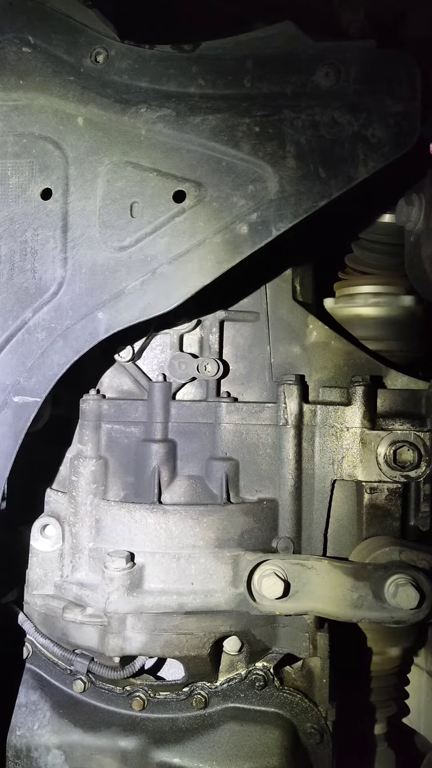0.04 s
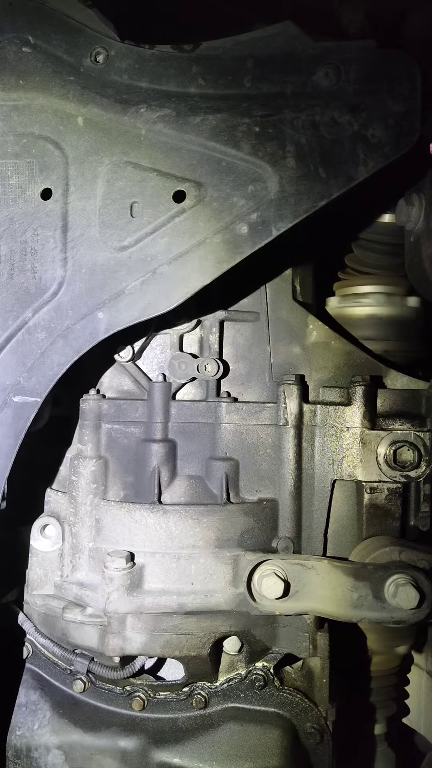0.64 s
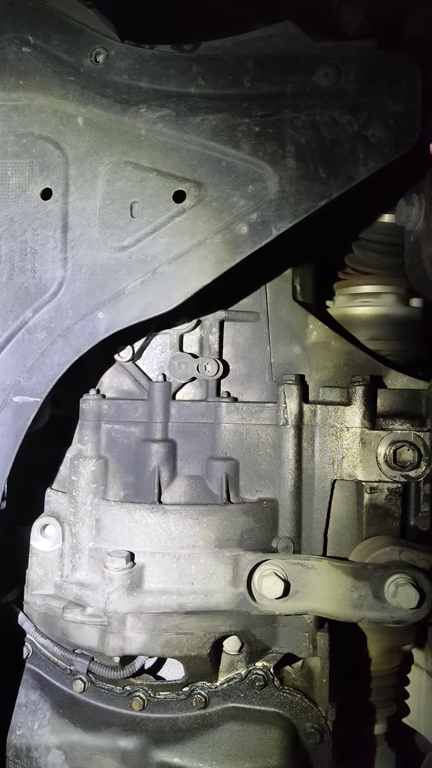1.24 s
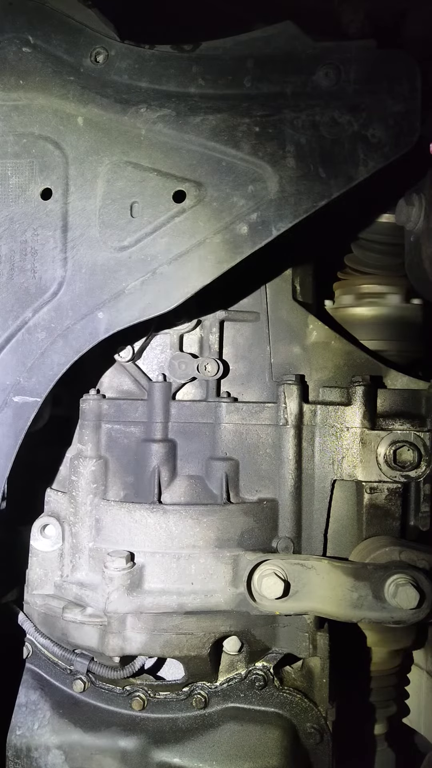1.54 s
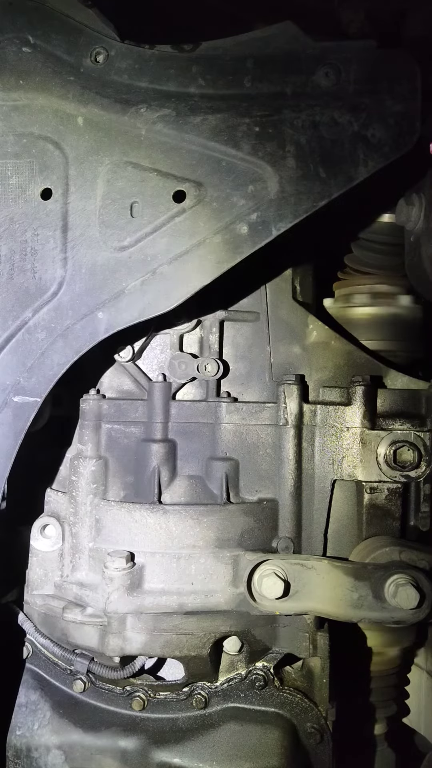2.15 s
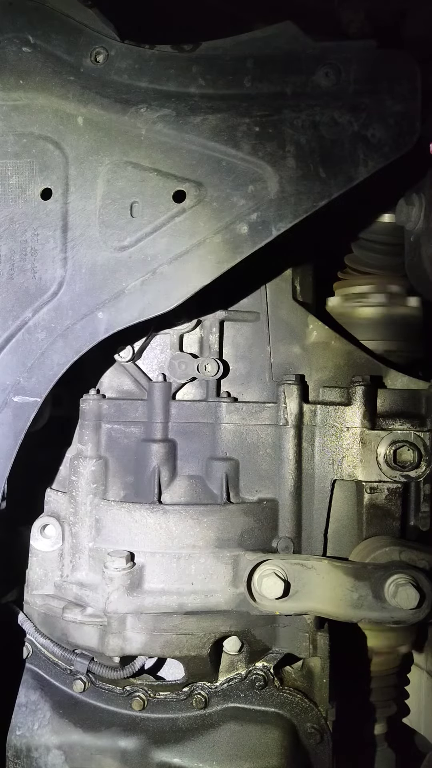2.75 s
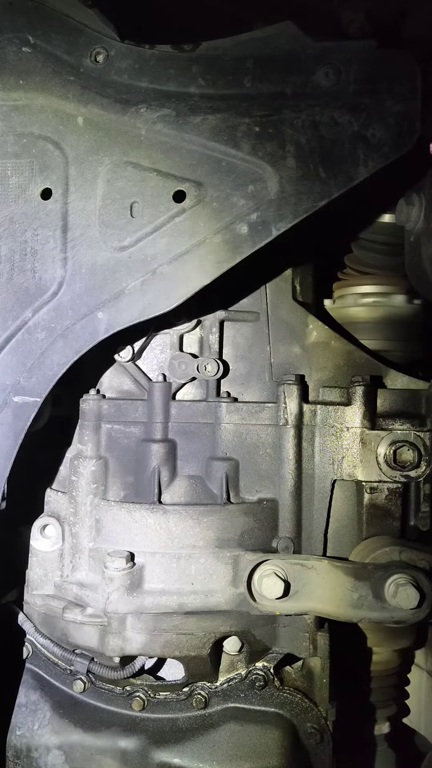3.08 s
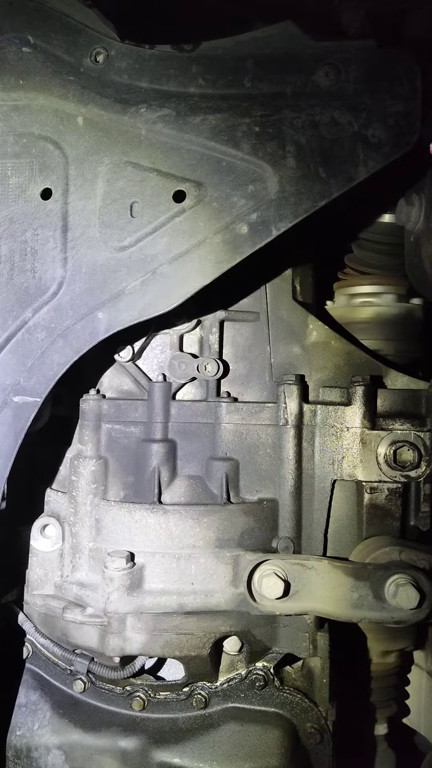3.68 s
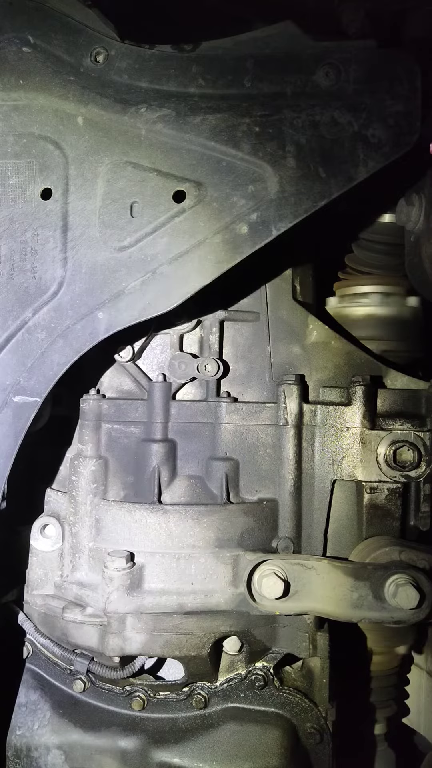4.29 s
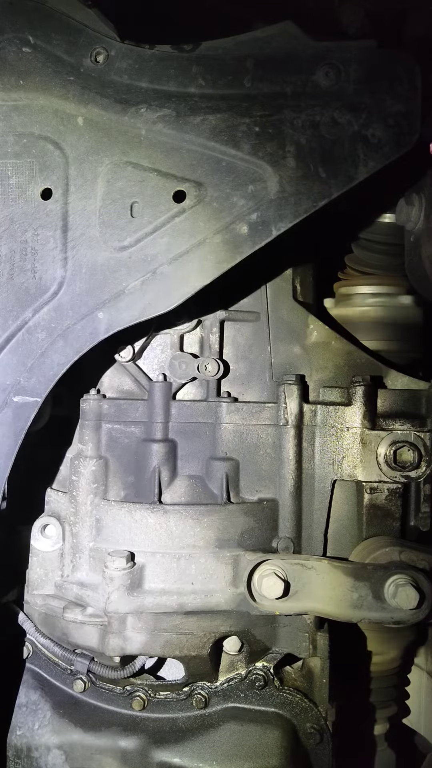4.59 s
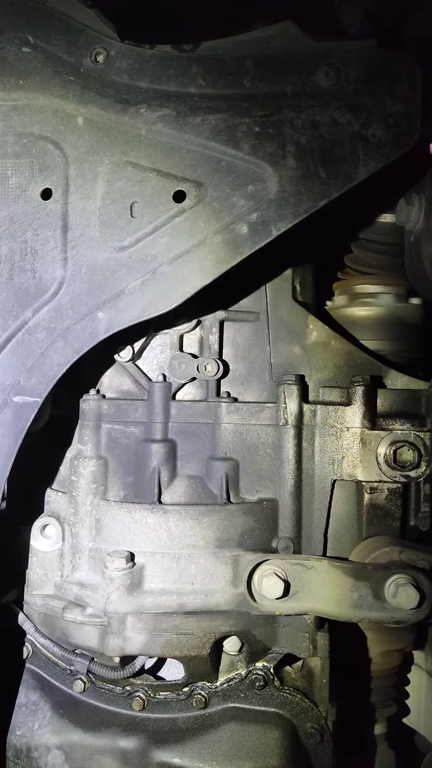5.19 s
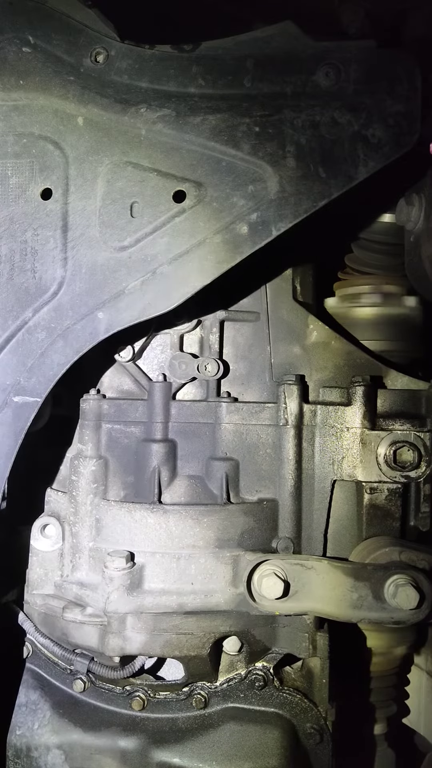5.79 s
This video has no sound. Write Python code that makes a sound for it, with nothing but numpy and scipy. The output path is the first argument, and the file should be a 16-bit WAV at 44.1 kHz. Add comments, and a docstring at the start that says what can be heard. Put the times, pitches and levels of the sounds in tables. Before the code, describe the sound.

A car drivetrain runs at an even speed, heard from close beneath its metal gear casing, whining over a rough, slightly hollow hiss and grind. The throttle closes and the pitch falls, with sharp metal knocks and a short, fluttering alternator whistle. Uneven clatter and small knocks from the slack gears continue at the lower speed until the whine picks up a little.

```python
"""A steady gear whine under a running car sinks as the throttle closes, then picks up again.
Meshing gear teeth, the firing engine and a belt-driven alternator all follow one speed. Bearings and
teeth grind in the ribbed metal casing under a broad hiss. The teeth have a little play (backlash), so
they rattle and knock in short bursts, mostly once the load has come off and while it returns.
Most parts get louder or softer with the speed and with the load, how hard the teeth are pressed."""
import sys
import numpy as np
from scipy import signal
from scipy.fft import rfft, irfft
from scipy.io import wavfile
from scipy.ndimage import uniform_filter1d, map_coordinates

SR = 44100
rng = np.random.default_rng(int(sys.argv[2]) if len(sys.argv) > 2 else 0)


def unload_audio(sound):
    """Save the sound as a 16-bit wav file, at the path given as the first command line argument."""
    columns = np.transpose(np.atleast_2d(sound))
    # keep every value between -1 and 1, then stretch to whole-number steps
    steps = np.round(np.clip(columns, -1, 1) * 32767)
    wavfile.write(sys.argv[1], SR, steps.astype(np.int16))


N = 257103
TIME, FREQ = np.arange(N) / SR, np.arange(N // 2 + 1) * SR / N
CRUISE_HZ = 207.5  # teeth meeting per second at cruising speed


def undb(db):
    """Turn decibels into a gain."""
    return 10 ** (np.asarray(db) / 20)


def unit(x):
    """Scale to an average strength (rms) of 1."""
    return x / np.sqrt(np.mean(x ** 2))


def curve(table):
    """Join a table's (time, value) points with straight lines, sample by sample."""
    return np.interp(TIME, *np.transpose(table))


def walk(rate):
    """A smooth random wobble of size 1 that changes about rate times a second."""
    knots = rng.standard_normal(4096)
    jagged = np.interp(TIME * rate, np.arange(len(knots)), knots)
    return unit(uniform_filter1d(jagged, max(int(SR / rate / 2), 1)))


def level(drive, db, per_octave_db, off_load_db):
    """A gain: db at a loaded cruise, changing with each doubling of speed and as the load comes off."""
    speed, load = drive
    return undb(db + per_octave_db * np.log2(speed) + off_load_db * (1 - load))


def resonance(hz, width, at=FREQ):
    """How a part that rings at hz answers each frequency; the gain is 1 at hz."""
    return 1j * at * width / (hz ** 2 - at ** 2 + 1j * at * width)


def radiate(force, colour, body):
    """Give a force its broad tone colour and the resonances of the body it shakes; rms 1."""
    hz, db = np.transpose(colour)
    gain = undb(np.interp(np.log(FREQ + 1), np.log(hz), db))
    roll_off = np.minimum(1, hz[-1] / (FREQ + 1)) ** 2 * np.minimum(1, FREQ / hz[0]) ** 2
    return unit(irfft(rfft(force) * gain * roll_off * body, N))


def impacts(rate, spread_db):
    """Tiny random metal contacts of uneven size, about rate a second."""
    happens = rng.random(N) < rate / SR
    return unit(happens * rng.standard_normal(N) * undb(spread_db * rng.standard_normal(N)))


def ringing(modes, rate):
    """Dense contacts keep metal ringing at its own pitches (modes); rms 1."""
    response = sum(undb(db) * np.abs(resonance(hz, width)) ** 2 for hz, width, db in modes)
    return unit(irfft(rfft(impacts(rate, spread_db=1.5)) * response, N))


def tones(cycles, orders, flutter_db, flutter_rate, slip):
    """Tones at multiples (orders) of a part's rate, wobbling in level and phase (slip, radians); rms 1."""
    total = 0
    for order, db in orders:
        phase = 2 * np.pi * (order * cycles + rng.random()) + slip * walk(flutter_rate)
        total = total + undb(db + flutter_db * walk(flutter_rate)) * np.sin(phase)
    return unit(total)


def gears(teeth, drive, drone_db, casing, flare_s=(3.1, 3.76), flare_db=4.4, fade_s=0.17):
    """Meshing teeth whine: a clean tone, its octave singing in the panels, high tones in the casing."""
    # panels that sing as the octave sweeps through them: (pitch [Hz], width [Hz], gain [dB])
    panels = [(285, 22, -29), (404.6, 18.6, -29)]
    # the whine's high tones: (multiple of the tooth rate, relative level [dB])
    upper_orders = [(3, -13), (4, -7.5), (5, -7), (6, -14.5), (7, -8.5), (8, -9.5), (10, -4)]
    speed, _ = drive
    mesh = tones(teeth, [(1, 0)], flutter_db=0.94, flutter_rate=23, slip=0.054) * undb(drone_db)
    octave = tones(teeth, [(2, 0)], flutter_db=3.0, flutter_rate=45, slip=0.16)
    octave_hz = 2 * CRUISE_HZ * speed
    panel_gain = np.abs(sum(undb(db) * resonance(hz, width, octave_hz) for hz, width, db in panels))
    upper = tones(teeth, upper_orders, flutter_db=5, flutter_rate=30, slip=0.09)
    upper = unit(irfft(rfft(upper) * casing, N))
    start, end = flare_s  # the high tones flare as the throttle closes
    flare = undb(flare_db * np.clip(.5 + np.minimum(TIME - start, end - TIME) / fade_s, 0, 1))
    return (mesh * level(drive, db=-29.0, per_octave_db=34.0, off_load_db=-2.5)
            + octave * panel_gain * level(drive, db=-1.06, per_octave_db=-2.5, off_load_db=-9.5)
            + upper * flare * level(drive, db=-33.0, per_octave_db=10.5, off_load_db=-4.0))


def engine(teeth, drive, drone_db, firings_per_tooth=.2905, drone_share=0.47, boom_db=17):
    """Firing cylinders drone softly, and boom briefly as their rate sinks through a body resonance."""
    # the engine's tones: (multiple of the firing rate, relative level [dB])
    orders = [(1, -11), (2, 2), (3, -2.5), (5, -1)]
    gain = level(drive, db=-44.5, per_octave_db=28.0, off_load_db=-10.5) * undb(drone_share * drone_db)
    drone = tones(teeth * firings_per_tooth, orders, flutter_db=2.5, flutter_rate=28, slip=.12) * gain
    boom = undb(boom_db * np.abs(resonance(hz=48, width=7)) ** 2)
    return irfft(rfft(drone) * boom, N)


def alternator(teeth, drive, turns_per_tooth=.3475):
    """The belt-driven alternator hums between the gear tones and whistles while the car coasts."""
    # tones of the hum and of the whistle: (multiple of the shaft rate, relative level [dB])
    hum_orders = [(8, -3), (9, -6.5), (10, -16.5), (12, -11.5)]
    whistle_orders = [(15, -11), (16, 0), (17, -19), (28, -19), (29, -17)]
    # the whistle swells with the throttle closed: (time [s], level [dB])
    whistle_level = [(3.5, -62), (3.68, -30.5), (3.8, -35.5), (3.935, -33), (3.965, -48), (4.01, -33.5),
                     (4.075, -39), (4.155, -33.5), (4.195, -41), (4.245, -29), (4.32, -34.5), (4.46, -37),
                     (4.56, -52), (4.8, -66)]
    shaft_turns = teeth * turns_per_tooth
    hum = tones(shaft_turns, hum_orders, flutter_db=0, flutter_rate=27, slip=0.15)
    whistle = tones(shaft_turns, whistle_orders, flutter_db=2.8, flutter_rate=55, slip=.5)
    return (hum * level(drive, db=-35.0, per_octave_db=18.0, off_load_db=-26)
            + whistle * undb(curve(whistle_level)))


def running_noise(teeth, drive, casing):
    """Dense contacts in the casing churn, grind and hiss; a thin spinning hiss stays without load."""
    # tone colour of each noise: (frequency [Hz], relative level [dB])
    churn_colour = [(25, -33.5), (60, -38), (100, -13.5), (165, -10), (250, -8.5), (330, -1.5), (450, -0.5),
                    (650, -3), (850, 1), (1100, -6.5), (1350, -11.5), (1700, -10), (3000, -33)]
    grind_colour = [(600, -15), (1200, -2), (1650, -4), (1850, 1.5), (2250, -2.5), (2450, -2), (2800, -6.5),
                    (3000, -1), (3400, -6.5), (4200, -5), (6000, -32)]
    hiss_colour = [(2000, -17.5), (3300, -7.5), (3800, -7), (4500, -4), (4900, -2), (5450, -2),
                   (6000, -1.5), (6500, -5.5), (6950, -11), (7400, -14), (7800, -23), (8300, -45.5)]
    spin_colour = [(1500, -18), (2700, -6.5), (4000, -1.5), (4800, 3), (6100, 5.5), (6700, -6.5),
                   (7300, -4.5), (7800, -19), (8300, -34.5)]
    tooth_pulse = undb(2.6 * np.cos(2 * np.pi * teeth))
    lumps = impacts(rate=3500, spread_db=2.5) * tooth_pulse * undb(2.4 * walk(22))
    churn = radiate(lumps, churn_colour, casing)
    grind = radiate(impacts(rate=9000, spread_db=1.5) * undb(0.83 * walk(45)), grind_colour, casing)
    hiss = radiate(rng.standard_normal(N) * undb(0.56 * walk(70)), hiss_colour, casing)
    spin = radiate(impacts(rate=5200, spread_db=3.5) * undb(0.57 * walk(25)), spin_colour, body=1)
    return (churn * level(drive, db=-29.5, per_octave_db=6, off_load_db=-6.5)
            + grind * level(drive, db=-25.0, per_octave_db=4.5, off_load_db=-6.5)
            + hiss * level(drive, db=-19, per_octave_db=9.0, off_load_db=-10.0)
            + spin * level(drive, db=-33.5, per_octave_db=6.5, off_load_db=1.5))


def housing(drive):
    """The gear housing and its bracket ring at steady pitches; load makes the ring wider and rougher."""
    # the main ring, and the neighbours that load adds: (pitch [Hz], width [Hz], relative level [dB])
    main_modes = [(2135, 120, 0)]
    loaded_modes = [(2040, 85, 0), (2225, 85, -1.5)]
    bracket_hz, bracket_width_hz = 986, 20
    loaded = ringing(loaded_modes, rate=1500) * undb(2 * walk(60))
    main = ringing(main_modes, rate=4000)
    bracket = ringing([(bracket_hz, bracket_width_hz, 0)], rate=3300)
    return (main * level(drive, db=-33, per_octave_db=-5.5, off_load_db=-14)
            + loaded * level(drive, db=-34.0, per_octave_db=11, off_load_db=-19.5)
            + bracket * level(drive, db=-44.0, per_octave_db=-5.0, off_load_db=-7.5))


def bearing(drive, wander=.007):
    """The bearing sings under load, a high rasp whose pitch wanders."""
    # the bearing's ring: (pitch [Hz], width [Hz], relative level [dB])
    modes = [(4885, 100, 0), (5100, 150, -2), (5410, 110, -1), (5550, 100, -2)]
    position = np.cumsum(1 + wander * walk(18))  # an uneven pace through the samples bends the pitch
    rasp = map_coordinates(ringing(modes, rate=8100), [position], order=3, mode="mirror")
    return rasp * level(drive, db=-25.2, per_octave_db=4.5, off_load_db=-22.5)


def underbody(x, t60, echo_db):
    """Quick echoes between the car's undertray, frame and floor make the noise hollow."""
    echoes = rng.standard_normal(N) * undb(-60 * TIME / t60) * (TIME > .003)
    echoes = undb(echo_db) * echoes / np.sqrt(np.sum(echoes ** 2))
    return (x + signal.fftconvolve(x, echoes)[:N]) / np.sqrt(1 + undb(2 * echo_db))


def patchy(x, spread, width_hz, rate):
    """Narrow bands of the noise swell and fade by chance, about rate times a second."""
    hz, times, frames = signal.stft(x, SR, nperseg=1024)
    spread_db = np.interp(times, *np.transpose(spread))
    band = np.broadcast_to(hz[:, None] / width_hz, frames.shape)
    moment = times * rate + 2 * np.sin(band)  # neighbours change at different moments
    chance = map_coordinates(rng.standard_normal((512, 256)), [band, moment], order=3, mode="mirror")
    gain = undb(spread_db * np.minimum(chance, np.sqrt(2)))  # the dips are deeper than the swells
    gain = gain / np.sqrt(np.mean(gain ** 2, axis=0))
    return signal.istft(frames * gain, SR, nperseg=1024)[1][:N]


def patchy_noise(x, treble_hz=2500):
    """The noise turns patchy and hollow, and later its treble breaks into short, coarse grains."""
    # how uneven the whole noise is, and its treble on top of that: (time [s], spread [dB])
    overall_spread = [(1.3, .8), (1.45, 2.3), (3.2, 2.3), (3.5, 5.2), (5.3, 5), (5.83, 3.2)]
    treble_spread = [(3.2, .8), (3.7, 3.4), (5.3, 3.3), (5.83, 1.8)]
    x = patchy(x, overall_spread, width_hz=95, rate=13)
    treble = irfft(rfft(x) * (FREQ > treble_hz), N)
    return x - treble + patchy(treble, treble_spread, width_hz=170, rate=38)


def rattles(drive, casing):
    """Teeth bounce across their play: a light, uneven chatter, and bursts of many small knocks."""
    # rattle bursts: (middle time [s], length [s], low clatter [dB], bright chatter [dB])
    bursts = [(0.943, 0.031, -25.5, -58), (1.1, 0.021, -28.5, -49.5), (3.575, 0.04, -33, -35),
              (3.904, 0.02, -34.5, -43), (4.427, 0.046, -29.5, -36), (4.613, 0.067, -29, -37),
              (4.698, 0.036, -32.5, -38.5), (4.853, 0.03, -33, -28.5), (5.008, 0.042, -34, -49),
              (5.387, 0.067, -29, -34.5), (5.556, 0.033, -34, -31), (5.683, 0.075, -29, -32.5),
              (5.81, 0.054, -31.5, -37)]
    # tone colour of the clatter and the chatter: (frequency [Hz], relative level [dB])
    clatter_colour = [(100, -44), (170, 0), (280, -6), (430, 4), (600, 1), (820, -1), (1000, -7),
                      (1200, 0.5), (1550, -9.5), (3000, -22.5)]
    chatter_colour = [(700, -5), (1300, -3.5), (2500, -2), (3400, 3.5), (4700, -9), (6500, -3), (8000, -37)]
    clatter_gain = 0
    chatter_gain = level(drive, db=-38, per_octave_db=2.5, off_load_db=-7) * undb(2 * walk(30))
    for middle, length, clatter_db, chatter_db in bursts:
        swell = np.exp(-2 * ((TIME - middle) / length) ** 2)
        clatter_gain = clatter_gain + swell * undb(clatter_db)
        chatter_gain = np.hypot(chatter_gain, swell * undb(chatter_db))
    clatter = radiate(impacts(rate=1100, spread_db=2), clatter_colour, casing)
    chatter = radiate(impacts(rate=7100, spread_db=0.5), chatter_colour, casing)
    return clatter_gain * clatter + chatter_gain * chatter


def knocks(casing, attack_s=0.00034, crack_t60_s=0.094, contact_s=.002, pivot_hz=700, scatter=0.04):
    """Teeth slam across their play as the load leaves and returns: a quick crack, and the casing rings."""
    # soft hits thud, hard ones clank: (time [s], crack [dB], ring [dB], ring's tilt [dB per octave])
    hits = [(3.444, -20.5, -31.5, 8), (3.451, -20.5, -26, 6), (3.654, -20, -32, 7), (3.670, -18, -23, 4),
            (3.679, -34, -32, 3), (3.729, -35, -30, 0), (4.568, -48, -27, -12), (4.592, -37, -27, 2),
            (4.603, -42, -31, -5), (4.626, -40, -26.5, -10), (4.653, -39, -35, -2), (4.715, -44, -32, -1),
            (4.793, -28, -33.5, 6), (4.855, -28, -34, 3), (4.998, -50, -34, -9), (5.144, -42, -30.5, -9),
            (5.379, -33, -34, -1), (5.402, -30, -31, 3), (5.416, -38, -32, -7), (5.541, -27.5, -24, -2),
            (5.549, -33, -27, 1), (5.566, -36, -26, 2), (5.685, -32, -30, 2), (5.696, -39, -30, -1),
            (5.761, -37, -31, -6), (5.815, -36, -27.5, -6)]
    # what rings in casing and bracket: (pitch [Hz], time to fade by 60 dB [s], relative level [dB])
    modes = [(305, 0.024, -4), (418, 0.051, -1.5), (503, .045, -2.5), (640, 0.015, -1), (740, .035, -3.5),
             (828, 0.077, 2), (996, .075, 1), (1114, 0.037, 0), (1230, .035, -5), (1560, .04, -13)]
    # the crack's tone colour: (frequency [Hz], relative level [dB])
    crack_colour = [(200, -41), (500, -11), (900, -0.5), (1250, 4.5), (1700, -2.5), (2500, -2), (3500, 2),
                    (4700, 7), (5500, -8), (6700, 6), (8000, -29)]
    crack_gain, ring = np.zeros(N), np.zeros(N)
    for start, crack_db, ring_db, tilt_db in hits:
        span = (TIME >= start) & (TIME < start + 2 * crack_t60_s)
        age = TIME[span] - start
        onset = np.minimum(age / attack_s, 1)
        crack_gain[span] += onset * undb(crack_db - 60 * age / crack_t60_s)
        push = np.minimum(age / contact_s, 1)  # the ring builds up while the teeth touch
        for hz, t60, db in modes:
            size = undb(ring_db + db + tilt_db * np.log2(hz / pivot_hz))
            cycles = hz * (1 + scatter * rng.standard_normal()) * age + rng.random()
            ring[span] += push * size * undb(-60 * age / t60) * np.sin(2 * np.pi * cycles)
    bass_cut = signal.butter(4, 260, "high", fs=SR, output="sos")  # the casing is too small for bass
    crack = crack_gain * radiate(rng.standard_normal(N), crack_colour, casing)
    return crack + signal.sosfilt(bass_cut, ring)


def scene():
    """One speed turns every part and one load presses on it; both ears hear the same close sound."""
    # the speed wavers at a cruise, sinks and picks up: (time [s], tooth rate [Hz])
    tooth_rate = [(0, 208), (.7, 205.7), (1.05, 208.8), (1.25, 206), (1.5, 208.7), (1.85, 208), (2, 205.5),
                  (2.3, 211.3), (2.55, 206.1), (2.8, 212.4), (3.15, 205.8), (3.8, 172.8), (4.1, 159.6),
                  (4.4, 148.6), (4.8, 124.7), (5.25, 116.2), (5.5, 118.3), (5.83, 131.5)]
    # the throttle closes, the idle catches the engine, the throttle opens: (time [s], load [0-1])
    tooth_load = [(0, 0.99), (.7, 1), (.92, 1), (1.45, 1), (1.7, 0.96), (2.58, 0.96), (2.95, 1),
                  (3.38, 0.78), (3.66, 0.37), (3.8, 0), (4.15, 0.15), (4.43, 0), (4.56, 0.33), (4.72, 0.65),
                  (5.1, 0.58), (5.33, 0.45), (5.83, 0.88)]
    # the low drone of gears and engine comes and goes: (time [s], relative level [dB])
    drone_level = [(0, -2), (1.31, -2), (1.42, -11), (2.1, -11), (2.35, -10.5), (2.6, -12.5), (2.8, -7),
                   (3.05, -10.5), (3.3, -7.5), (3.8, -10.5), (4.05, -12.5), (4.7, -8), (5.45, -3),
                   (5.62, -2.5), (5.83, -4)]
    # the casing's resonances and the dips between them: (frequency [Hz], width [Hz], lift [dB])
    casing_modes = [(427, 46, 5.5), (602, 160, 4.5), (818, 160, 4), (971, 33, 4), (1168, 60, 4),
                    (1512, 82, 6), (1645, 70, -2.5), (2510, 90, -2.5), (2700, 70, 3), (2806, 83, -7),
                    (2923, 160, 4), (3170, 60, 1.5), (3700, 70, 3)]
    tooth_hz, drone_db = curve(tooth_rate), curve(drone_level)
    drive = tooth_hz / CRUISE_HZ, curve(tooth_load)  # (speed, load)
    teeth = np.cumsum(tooth_hz) / SR  # tooth contacts so far
    casing = undb(sum(db * np.abs(resonance(hz, width)) ** 2 for hz, width, db in casing_modes))
    tonal = gears(teeth, drive, drone_db, casing) + engine(teeth, drive, drone_db)
    tonal += alternator(teeth, drive)
    noise = running_noise(teeth, drive, casing) + rattles(drive, casing)
    noise = underbody(noise, t60=0.034, echo_db=-15.5)
    sound = tonal + housing(drive) + patchy_noise(noise + bearing(drive)) + knocks(casing)
    return np.array([sound, sound])


def record(dry):
    """Cut the treble steeply above 8200 Hz."""
    return signal.sosfilt(signal.ellip(10, .2, 80, 8200, fs=SR, output="sos"), dry)


dry = scene()
out = record(dry)
unload_audio(out)
```